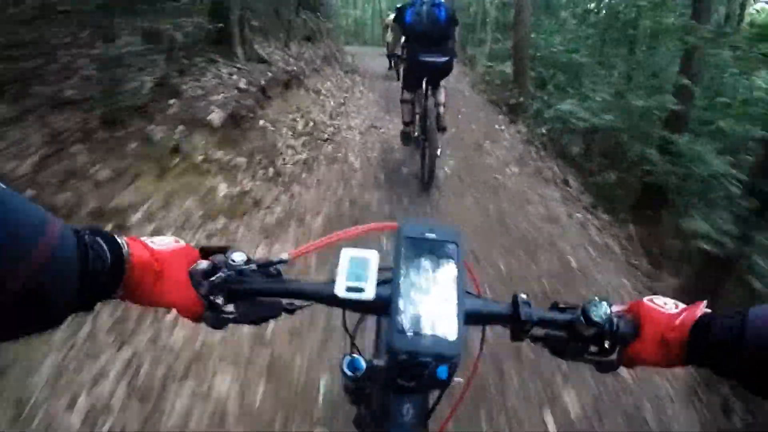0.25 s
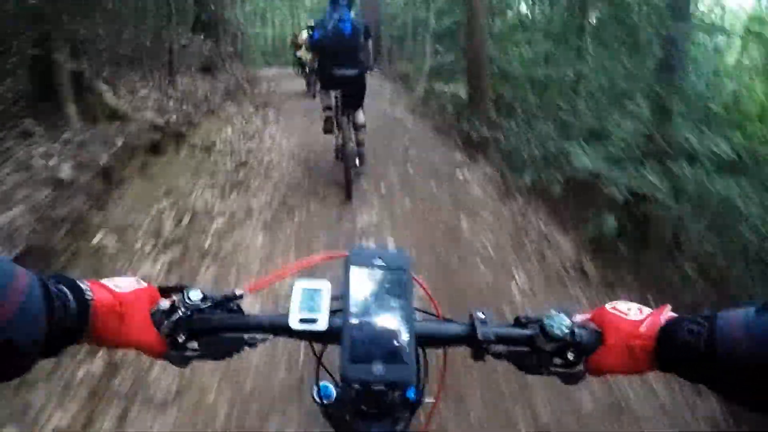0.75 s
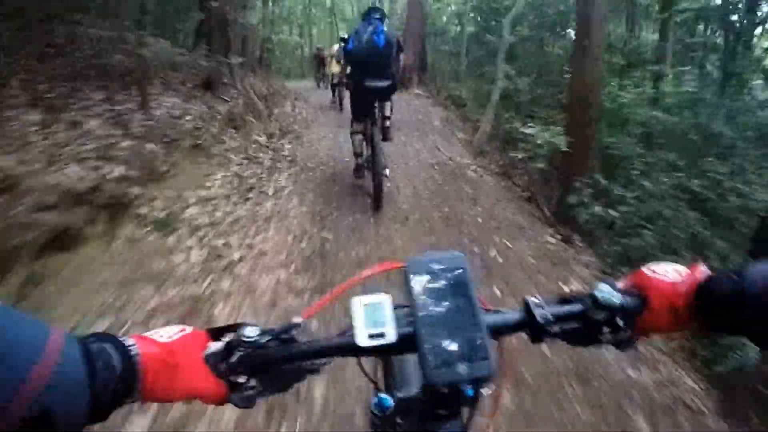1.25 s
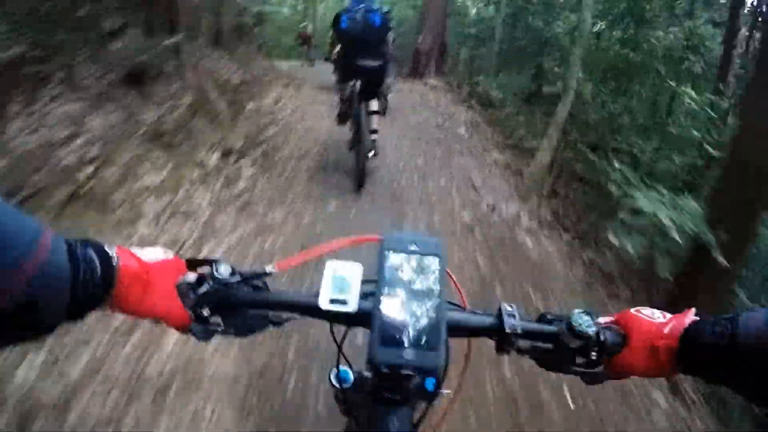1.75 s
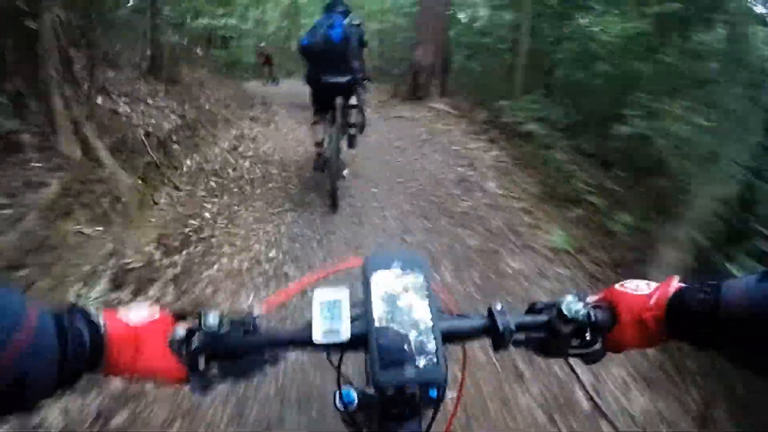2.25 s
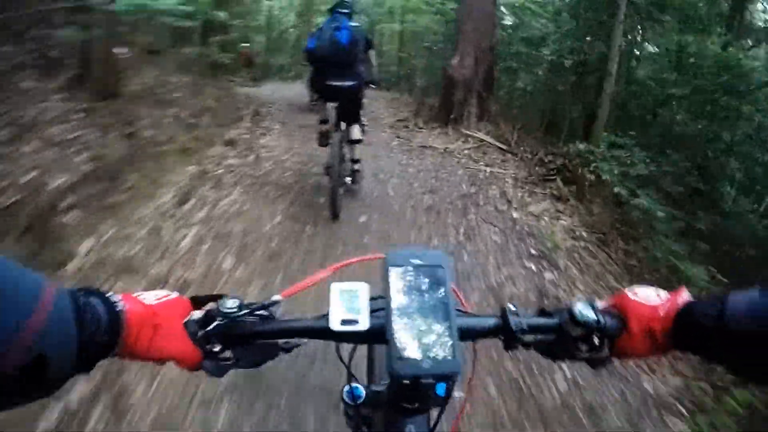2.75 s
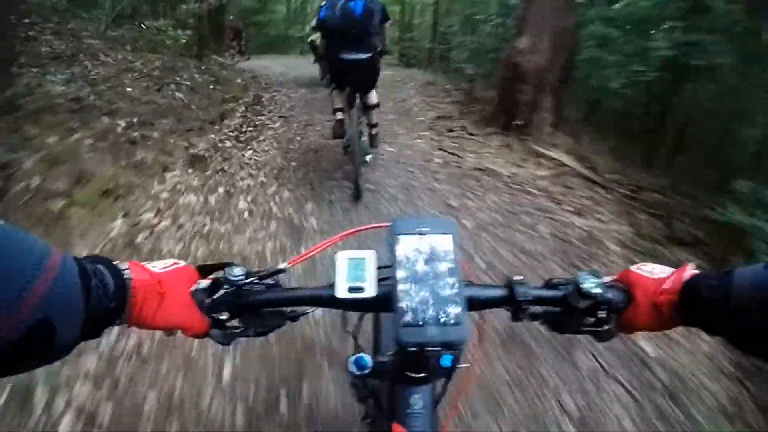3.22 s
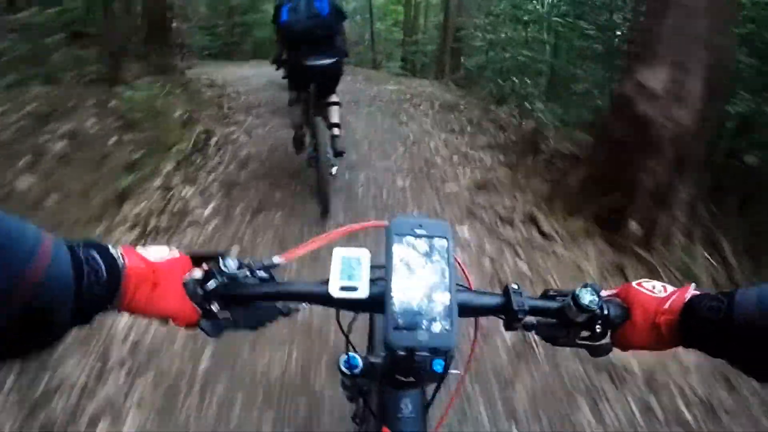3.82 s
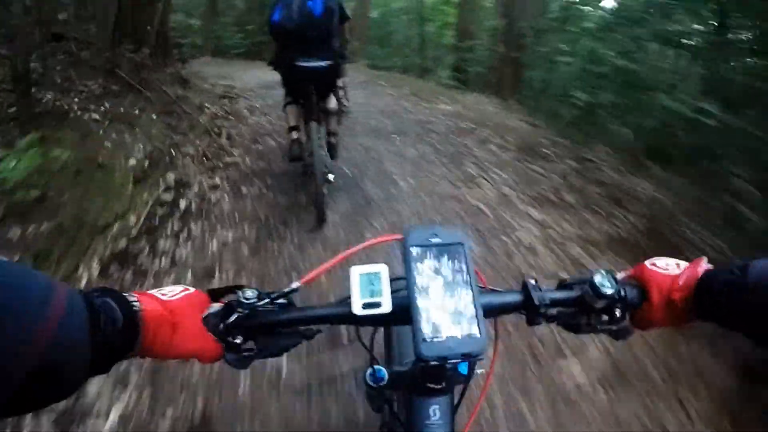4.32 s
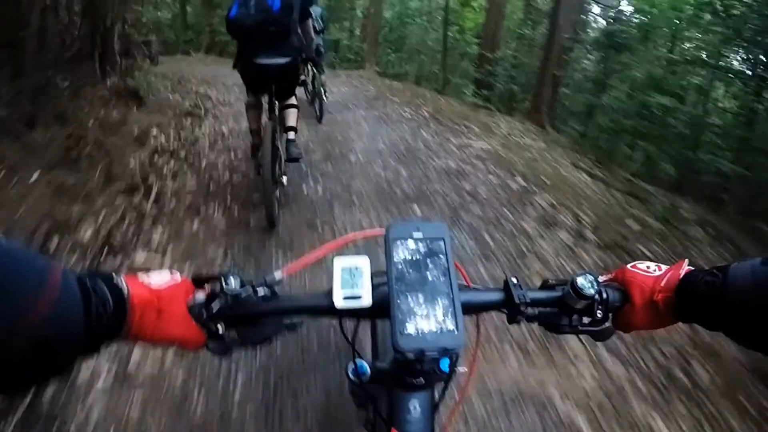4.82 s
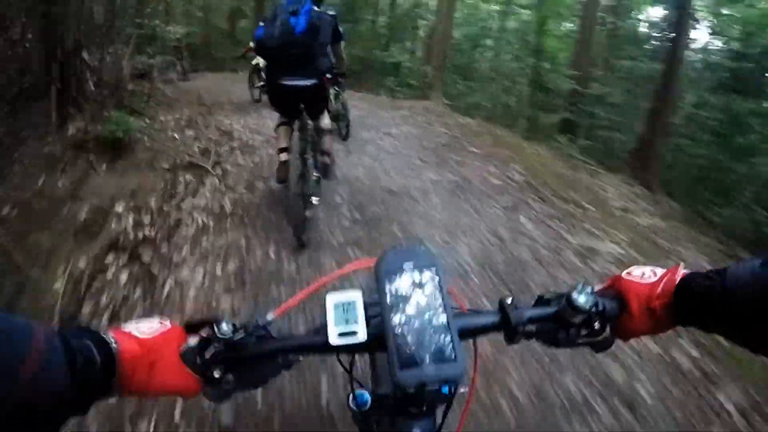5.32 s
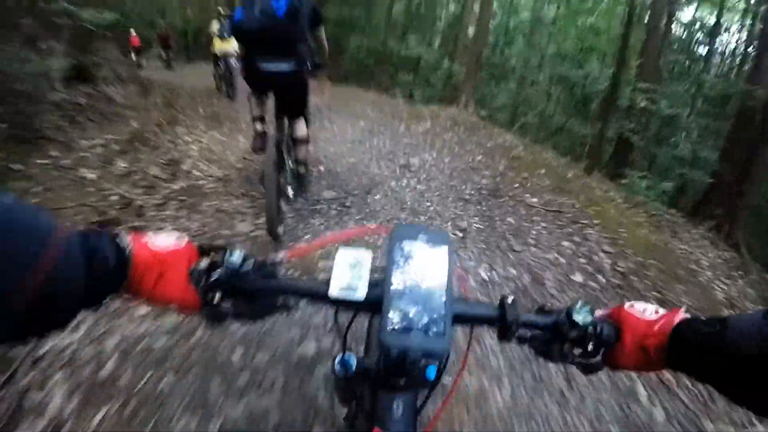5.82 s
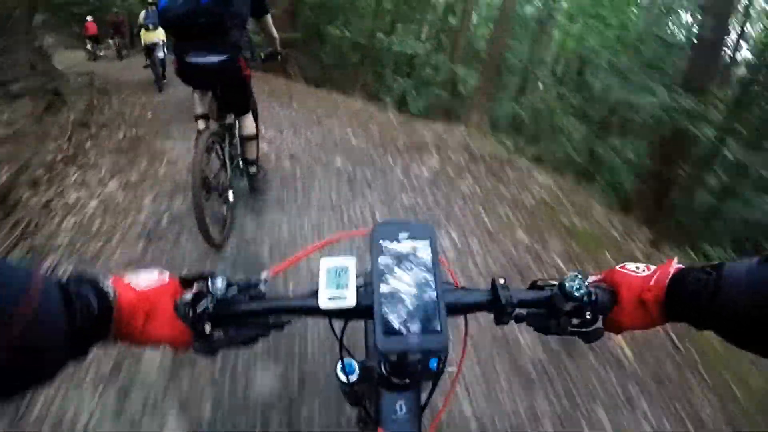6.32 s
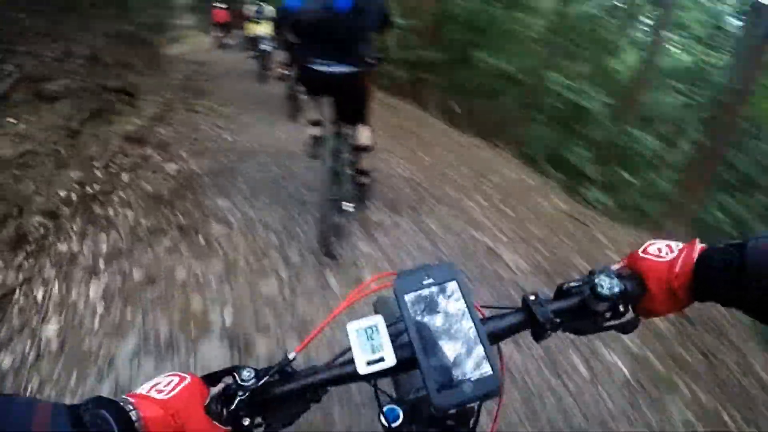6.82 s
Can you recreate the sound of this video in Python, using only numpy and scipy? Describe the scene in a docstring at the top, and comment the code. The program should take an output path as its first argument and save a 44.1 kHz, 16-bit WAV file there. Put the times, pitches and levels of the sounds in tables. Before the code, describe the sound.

Sharp plastic rattling blows, close and overloaded, clatter unevenly over the quiet rumble and gritty crunch of knobby tyres on a forest track.

```python
"""First comes a low rumble of ground and air, with the crunch of knobby tyres: a mountain bike runs fast down
a leafy dirt trail, heard from a camera strapped to the rider's chest. Rumble and crunch are shaped noise.
Stones and twigs snap, bumps thump the harness and knock the bike, and loose parts shiver after hard blows.
Loudest of all, the camera's plastic case clacks on its mount and rebounds: struck resonances that overload
the mono microphone."""
import sys
import numpy as np
from scipy import signal
from scipy.fft import rfft, irfft, next_fast_len
from scipy.io import wavfile
from scipy.ndimage import uniform_filter1d

SR = 44100
rng = np.random.default_rng(int(sys.argv[2]) if len(sys.argv) > 2 else 0)


def inscribe(sig):
    """Save sig as 16-bit PCM at rate SR to the path in sys.argv[1].

    A 1-D sig is mono; a 2-D sig holds one channel per row.
    Samples are clipped to [-1, 1] before scaling.
    """
    pcm = np.round(np.clip(np.atleast_2d(sig).T, -1, 1) * 32767)
    wavfile.write(sys.argv[1], SR, pcm.astype(np.int16))


N = 311346  # length of the scene in samples
RING_SIZE = 4096  # samples in one struck sound


def undb(db):
    """Turn decibels into a gain."""
    return 10 ** (np.asarray(db) / 20)


def unit(x):
    """Scale a sound to an average (rms) strength of 1."""
    return x / np.sqrt(np.mean(x ** 2))


def noise():
    """Plain hiss, as long as the scene."""
    return rng.standard_normal(N)


def level_over_time(table):
    """Join (t/s, level/dB) points with straight lines, one value per sample."""
    times, levels_db = np.transpose(table)
    return np.interp(np.arange(N) / SR, times, levels_db)


def add(track, start_s, sound):
    """Mix a sound into the track at a time, cutting off what runs past the end."""
    start = max(int(round(start_s * SR)), 0)
    part = track[start:start + len(sound)]
    part += sound[:len(part)]


def colour(x, points):
    """Shape a sound's spectrum with (f/Hz, level/dB) points, then scale it to rms 1."""
    hz, db = np.transpose(points)
    size = next_fast_len(N)
    f = np.fft.rfftfreq(size, 1 / SR)
    gain = undb(np.interp(np.log(f + 1), np.log(hz), db))
    return unit(irfft(rfft(x, size) * gain, size)[:N])


def walk(rate):
    """A smooth random wander with rms 1, taking `rate` new random values per second."""
    hold = max(int(SR / rate), 1)
    steps = np.repeat(rng.standard_normal(N // hold + 1), hold)
    return unit(uniform_filter1d(steps, hold)[:N])


def grit(rate, spread_db):
    """Random tiny impacts, about `rate` per second, many small and a few large."""
    hit = rng.random(N) < rate / SR
    size = undb(spread_db * np.minimum(rng.exponential(size=N), 4))
    return unit(hit * size * rng.standard_normal(N))


def flutter(x, depth_db, rate):
    """Stones and leaves of different sizes take turns: each octave swells and fades on its own."""
    size = next_fast_len(N)
    spectrum = rfft(x, size)
    # octaves above 400 Hz; the outer two bands also take everything beyond them
    octave = np.clip(np.log2(np.fft.rfftfreq(size, 1 / SR) / 400 + 1e-9), 0, 4)
    total = np.zeros(N)
    for k in range(5):
        share = np.maximum(1 - np.abs(octave - k), 0)
        band = irfft(spectrum * share, size)[:N]
        total += band * undb(depth_db * walk(rate))
    return unit(total)


def ring(modes, scatter_db, detune, tilt_db, lag_s):
    """A struck body, peak 1: each contact point favours other resonances; tilt_db per octave brightens it."""
    hz, width, db = np.transpose(modes)
    f = np.fft.rfftfreq(RING_SIZE, 1 / SR)
    level_luck, pitch_luck = rng.standard_normal((len(hz), 2)).T
    gain = undb(db + scatter_db * level_luck + tilt_db * np.log2(hz / hz[0]))
    distance = f[:, None] - hz * (1 + detune * pitch_luck)
    peaks = np.sum(gain / (1 + (2 * distance / width) ** 2), axis=1)
    # folding the cepstrum makes all ringing follow the blow
    cepstrum = irfft(np.log(peaks))
    cepstrum[1:RING_SIZE // 2] *= 2
    cepstrum[RING_SIZE // 2 + 1:] = 0
    # bending waves travel slower the lower they are, so the body arrives after the tick
    delay = lag_s * (np.sqrt(f[-1] / (f + f[1])) - 1)
    phase = 2 * np.pi * np.cumsum(delay) * f[1]
    y = irfft(np.exp(rfft(cepstrum) - 1j * phase))
    return y / np.abs(y).max()


def scuffed(sound, share, decay_s):
    """The surfaces scrape briefly after they meet, which roughens the ring."""
    t = np.arange(RING_SIZE // 2) / SR
    scrape = rng.standard_normal(len(t)) * np.exp(-t / decay_s)
    push = share * scrape / np.linalg.norm(scrape)
    push[0] += 1  # the clean first blow
    return signal.fftconvolve(sound, push)


# how strongly air and ground shake the camera: (t/s, level/dB)
BUFFET = [(0.0, -38.5), (0.58, -25.8), (0.68, -37), (1.04, -27.5), (1.28, -39), (1.4, -35), (2.28, -33),
          (2.5, -49.5), (2.58, -38.5), (4.36, -32.5), (4.44, -34), (5.84, -28), (5.94, -40.5), (7.04, -34)]
# tone of that shaking, before its loudness is set: (f/Hz, level/dB)
RUMBLE_TONE = [(10, -32.5), (17, 1), (32, 2.5), (59, -9.5), (184, -18.5), (300, -30.5), (450, -50),
               (1100, -93.5)]


def rumble():
    """Tyre drone and rushing air shake the case in gusts; small bumps make it lumpy."""
    shaking = noise() + 0.5 * grit(rate=40, spread_db=3.0)
    gusts_db = level_over_time(BUFFET) + 1.66 * walk(13) - 0.2
    return colour(shaking, RUMBLE_TONE) * undb(gusts_db)


# how hard the tyres crunch on the ground, before small random changes: (t/s, level/dB)
ROLL = [(0.0, -53.5), (0.06, -45.5), (0.68, -45.5), (0.74, -46), (0.92, -37.5), (1.38, -50), (1.46, -44.5),
        (2.0, -50), (2.06, -42.5), (2.32, -62.5), (2.4, -50), (2.54, -61), (2.64, -49.6), (3.62, -48),
        (3.7, -53.5), (3.86, -41), (4.16, -51.5), (4.3, -39.5), (4.62, -50.5), (4.74, -43.5), (4.9, -49),
        (5.12, -34), (5.18, -42), (5.42, -38), (5.5, -49.1), (5.66, -39.3), (5.72, -50.5), (6.44, -51.5),
        (6.82, -45), (6.92, -50.5), (6.98, -42.5), (7.04, -47)]
# tone of the crushed grit and leaves, before flutter: (f/Hz, level/dB)
CRUNCH_TONE = [(150, -1.5), (300, -10.5), (420, -11), (780, -11), (950, -9.5), (1900, -2), (2550, -9),
               (2900, -12.5), (4080, -8), (4600, -20), (7000, -29.5), (15000, -75.5)]
# tone of the fine dirt flung up, before its loudness is set: (f/Hz, level/dB)
SPRAY_TONE = [(4000, -5), (6000, -2.5), (7500, -2), (10000, -3.5), (14000, -7.5), (15200, -12),
              (16000, -49.5)]


def tyres(spray_growth=0.89):
    """Knobs crush grit and leaves and fling fine dirt; the load varies with the uneven ground."""
    load_db = level_over_time(ROLL) + 2.0 * walk(40)
    # each grain crumbles for a moment as it is crushed
    impacts = grit(rate=450, spread_db=3.9)
    grains = unit(scuffed(impacts, share=1.45, decay_s=0.0028)[:N])
    crunch = colour(noise() + 1.2 * grains, CRUNCH_TONE)
    crunch = flutter(crunch, depth_db=3.5, rate=60)
    spray = colour(noise() + 0.7 * grit(rate=2800, spread_db=3.0), SPRAY_TONE)
    # spray_growth: dB of spray gained per dB of load
    spray_db = spray_growth * load_db + 1.7 * walk(8.7) - 25.5
    return crunch * undb(load_db + 0.16) + spray * undb(spray_db)


# stones and twigs that snap, levels relative to each other: (t/s, level/dB, centre f/Hz)
SNAPS = [(0.1333, -17.5, 3900), (.179, -19, 1640), (0.203, -27.5, 4050), (0.507, -23, 3240),
         (.659, -30, 2700), (1.105, -30, 2160), (1.317, -30, 2290), (5.077, -24.5, 2060),
         (5.123, -24.5, 2400), (6.337, -23, 2200)]


def snaps(relative_width=0.79):
    """A stone or twig gives way in a short burst of cracks; smaller pieces crack higher and broader."""
    out = np.zeros(N)
    for start_s, db, hz in SNAPS:
        crack = ring([(hz, relative_width * hz, 0)], scatter_db=0, detune=0, tilt_db=0, lag_s=0)
        add(out, start_s, undb(db) * scuffed(crack, share=2.3, decay_s=0.0031))
    return out * undb(-2.5)


# soft thumps through the harness: (t/s, level/dB, pitch f/Hz)
THUMPS = [(0.398, -11, 112), (0.503, -6.5, 105), (0.7455, -11.5, 95), (1.04, -19.5, 106),
          (1.742, -11, 95.5), (2.064, -13, 90), (2.632, -21.5, 110), (2.711, -17.5, 109), (5.342, -24, 65),
          (5.492, -12, 71.6), (5.532, -14, 71), (5.779, -9, 78), (6.618, -20, 69.6)]


def harness_thumps(swell_s=0.0042):
    """The padded harness bounces for about two cycles, a low tone that swells and dies away."""
    out = np.zeros(N)
    t = np.arange(RING_SIZE) / SR
    bounce = (t / swell_s * np.exp(1 - t / swell_s)) ** 1.11
    for start_s, db, hz in THUMPS:
        add(out, start_s, undb(db) * bounce * np.sin(2 * np.pi * hz * t))
    return out


# bumps that knock the bike, levels relative to each other: (t/s, level/dB, brightness/dB per octave)
KNOCKS = [(0.246, -20.5, -4), (.371, -27, -0.5), (.506, -19, 3), (0.901, -0.5, 7.5), (0.905, -9.5, -1),
          (1.009, -10, -1), (2.054, -11, -1.5), (2.851, -24.5, -2), (4.009, -13, -2.5), (4.365, -16, -1),
          (4.628, -27, -3), (5.137, -13.5, 1.5), (5.331, -11.5, 6.5), (5.347, -5.5, -0.5), (5.535, -3.5, 2),
          (5.539, -2.5, 11), (5.74, -21, .5), (5.828, -18, 1), (6.156, -25, 2), (6.259, -26, -2.5)]
# resonances of the bike, before each knock shifts them a little: (f/Hz, width/Hz, level/dB)
BIKE = [(118, 110, -5), (250, 80, 2), (428, 180, -28.5), (618, 130, -4.5), (746.5, 93, -2), (973, 81, 0.5),
        (1390, 560, -20.5), (1810, 440, -10.5), (2120, 310, -13.5), (2470, 310, -13), (4130, 320, -23),
        (5180, 120, -34.5)]


def bike_knocks():
    """Fork, frame and chain take the bumps: duller and longer than the case, with a short chatter."""
    out = np.zeros(N)
    for start_s, db, bright_db in KNOCKS:
        knock = ring(BIKE, scatter_db=1.8, detune=0.014, tilt_db=bright_db, lag_s=0.000517)
        add(out, start_s, undb(db) * scuffed(knock, share=0.61, decay_s=0.0049))
    return out * undb(2.5)


# tone of the loose parts, before its loudness is set: (f/Hz, level/dB)
SHIVER_TONE = [(120, -6.5), (300, 7.5), (1900, -1.5), (2600, -20.5), (5000, -19)]


def shiver(blows, decay_s, shiver_db):
    """Straps, cables and loose parts keep shaking for a moment after each blow."""
    t = np.arange(2 * RING_SIZE) / SR
    tail = colour(noise(), SHIVER_TONE)[:len(t)] * np.exp(-t / decay_s)
    tail /= np.linalg.norm(tail)
    return undb(shiver_db) * signal.fftconvolve(blows, tail)[:N]


def rebounds(start_s, db, loss_db, count=3):
    """A blow and its rebounds as (t/s, level/dB): each flight is shorter and each landing weaker."""
    first_flight_s, shrink, settle_db = 0.0063, 0.72, 1  # settle_db: loss that grows with each rebound
    for k in range(count):
        yield start_s, db
        start_s += first_flight_s * shrink ** k
        db -= loss_db + k * settle_db


# blows of the case on its mount, levels relative to each other; the faint one at 6.1333 s, mostly hollow body,
# is a knock of the bike: # (t/s, level/dB, extra level of the hollow body/dB, basic loss per rebound/dB)
CLACKS = [(0.2986, 5.5, -1.5, 8), (0.428, 6.5, 0, 7.5), (0.561, 7.5, 0.5, 8), (0.9588, 2, -5.5, 18),
          (1.0197, 0.5, -19, 27), (1.5585, 4, 7, 27), (1.9567, 1, 1, 18), (2.0999, 14, -3, 10.5),
          (2.238, 7.5, -4, 34), (2.2538, -3, -2, 5), (2.339, -0.5, -2.5, 11), (2.3634, -11.5, 5, 20),
          (2.5597, -0.5, -0.5, 9.5), (2.62, -4.5, 2.5, 22), (2.7322, 1.5, 1, 8), (3.1239, 1.5, 3, 27),
          (3.2631, 7.5, -0.5, 5), (3.309, -11, 3.5, 22), (3.499, 10, 1, 17.5), (3.7108, -9, 1.5, 15),
          (4.0231, 10.5, -4, 21), (4.0365, -4, 0, 11), (4.3726, 9.5, -2.5, 36), (4.5356, -0.5, 1.5, 27),
          (4.6353, 7.5, 2.5, 21), (4.7325, 2.5, -0.5, 5), (4.895, -16, 12.5, 19), (4.986, -19.5, 5, 25),
          (5.3541, 2, 8, 6.5), (5.4919, 6, 10.5, 29), (5.7794, 10, 3.5, 9), (5.84, -1.5, 5.5, 22),
          (5.9789, -4.5, 7, 21), (6.0933, 2, 3, 20.5), (6.1333, -21, 18.5, 26), (6.288, 7.5, 0.5, 13.5),
          (6.6189, 7, 5.5, 11), (7.0417, 5.5, 4, 18)]
# resonances of the plastic case, before each blow shifts them a little: (f/Hz, width/Hz, level/dB)
CASE = [(200.6, 61, -3), (303.5, 22, -9.5), (406.6, 47, -10), (574, 32.5, -8), (668, 140, -10.5),
        (952, 50.5, -11.5), (1159, 212, -13), (1944, 283, -3.5), (2156, 53, -7.5), (2441, 143, -0.5),
        (2569, 345, 1.5), (3369, 194, -3.5), (4035, 530, -5.5), (5350, 264, -19.5), (6250, 260, -25.5),
        (8700, 300, -51), (9170, 840, -35), (12900, 2100, -39.5)]


def case_clacks():
    """Hard plastic on plastic: a few ms of bright ring over a hollow body, which square-on blows excite most."""
    out = np.zeros(N)
    hz, width, mode_db = np.transpose(CASE)
    hollow = hz < 1500  # the low resonances belong to the hollow body
    for first_s, first_db, body_db, loss_db in CLACKS:
        modes = np.column_stack([hz, width, mode_db + body_db * hollow])
        for start_s, db in rebounds(first_s, first_db, loss_db):
            clack = ring(modes, scatter_db=2.5, detune=0.018, tilt_db=0.65, lag_s=0.0002546)
            add(out, start_s, undb(db) * scuffed(clack, share=0.49, decay_s=0.0023))
    return out * undb(-1.01)


def scene():
    """Everything reaches one microphone inside the case, so both channels are the same."""
    background = rumble() + tyres() + snaps() + harness_thumps()
    blows = bike_knocks() + case_clacks()
    mono = background + shiver(blows, decay_s=0.015, shiver_db=-24.0) + blows
    return np.array([mono, mono])


def record(dry, ceiling=0.96, knee=4.55):
    """Sounds too loud for the input are flattened towards a ceiling; then the top treble is cut."""
    clipped = dry / (1 + np.abs(dry / ceiling) ** knee) ** (1 / knee)
    top_hz = 15800
    low_pass = signal.ellip(8, 0.2, 70, top_hz, fs=SR, output="sos")
    return signal.sosfilt(low_pass, clipped)


dry = scene()
out = record(dry)
inscribe(out)
```